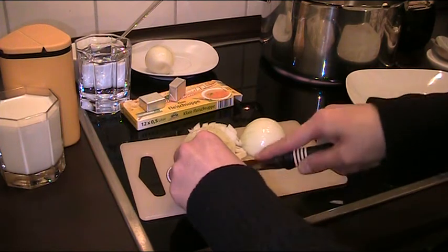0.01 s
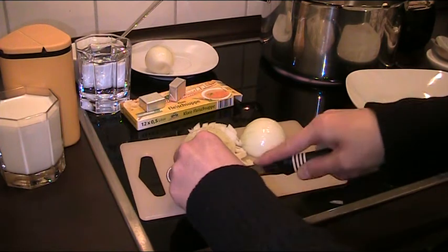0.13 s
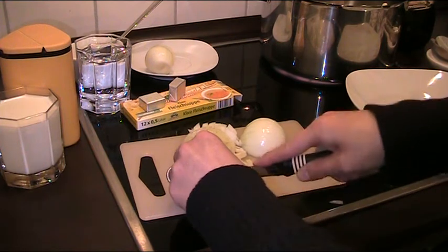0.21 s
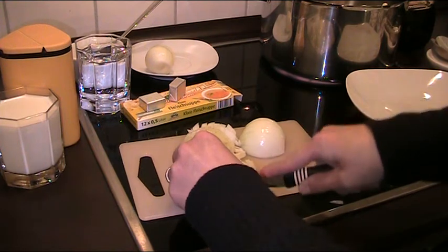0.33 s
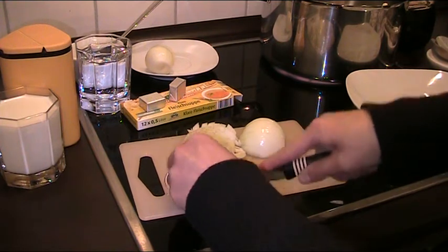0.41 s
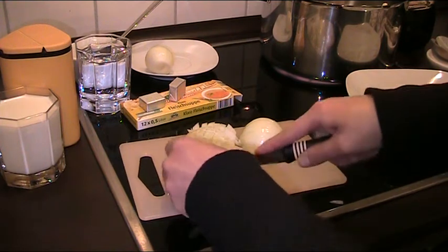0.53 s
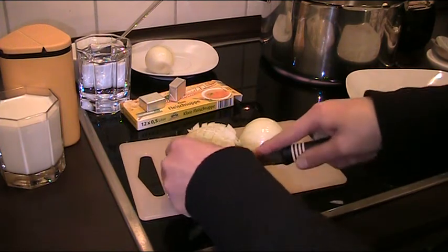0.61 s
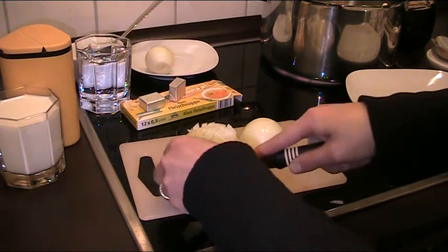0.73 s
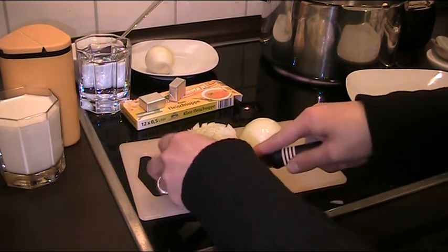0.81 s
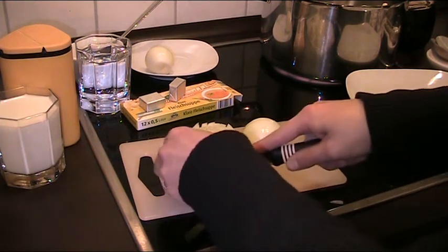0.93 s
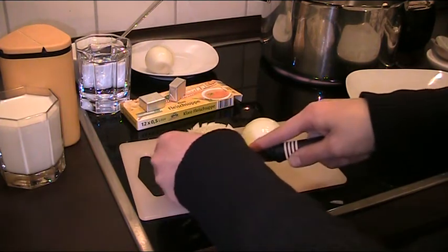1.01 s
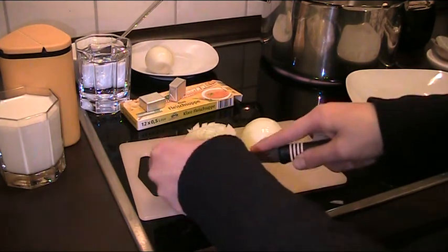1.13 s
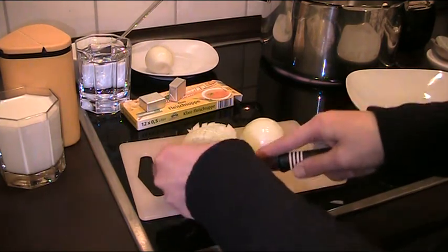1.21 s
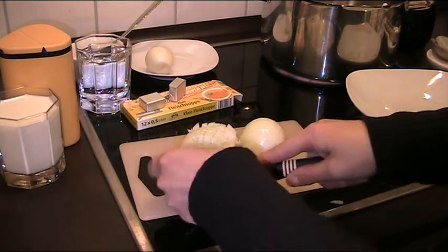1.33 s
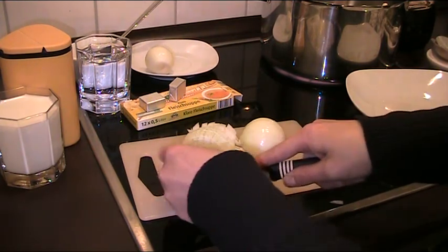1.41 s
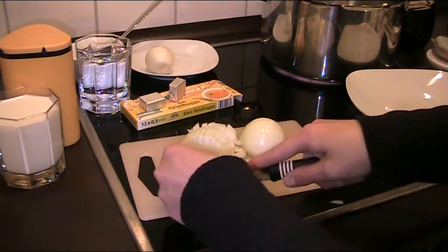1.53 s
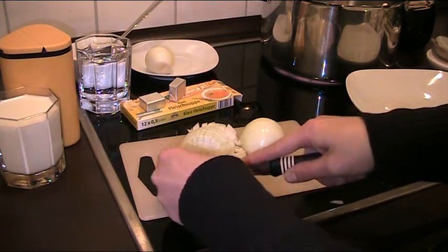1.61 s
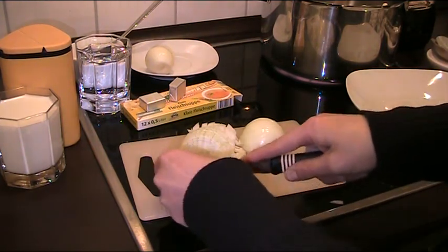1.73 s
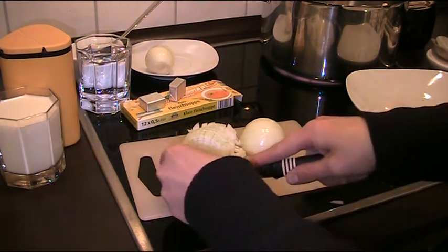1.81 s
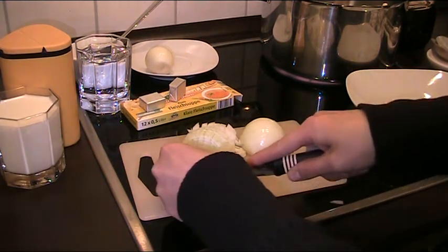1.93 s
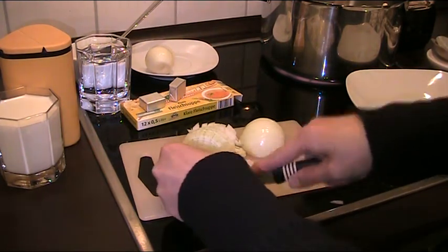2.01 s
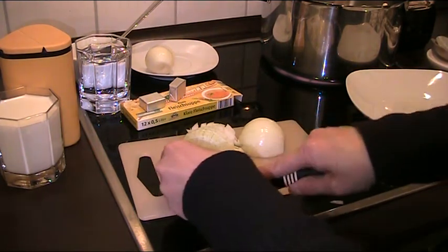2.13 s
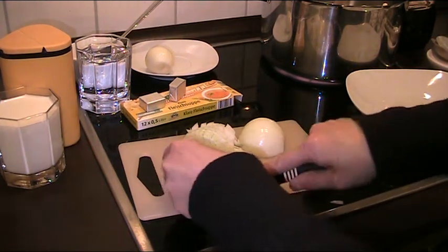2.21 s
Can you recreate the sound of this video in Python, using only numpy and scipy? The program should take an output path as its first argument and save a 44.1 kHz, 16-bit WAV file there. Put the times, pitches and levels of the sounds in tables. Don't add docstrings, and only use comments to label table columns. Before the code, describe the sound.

A kitchen knife crunches through onion and knocks hard on a plastic board, twice, with a pause between

```python
import sys
import numpy as np
from scipy import signal
from scipy.fft import rfft, irfft
from scipy.io import wavfile
from scipy.ndimage import uniform_filter1d

SR = 44100
rng = np.random.default_rng(int(sys.argv[2]) if len(sys.argv) > 2 else 0)


def makeup_ratio(level_db):
    decades = np.asarray(level_db, float) / 20
    return 10 ** decades


def persist_wave(psi):
    counts = np.round(np.clip(psi, -1, 1) * 32767).astype(np.int16)
    wavfile.write(sys.argv[1], SR, np.atleast_2d(counts).T)


N = 101430


def evened(x):
    return x / np.sqrt(np.mean(x ** 2) + 1e-20)


def read(points, hz):
    f, value = np.transpose(points)
    return np.interp(np.log(hz + 1), np.log(f + 1), value)


def add(mix, start_s, sound):
    part = mix[max(round(start_s * SR), 0):][:len(sound)]
    part += sound[:len(part)]


def colour(x, table):
    hz = np.fft.rfftfreq(256, 1 / SR)
    kernel = np.roll(irfft(makeup_ratio(read(table, hz))), 128) * np.hanning(256)
    return signal.oaconvolve(x, kernel, "same")


def ring(modes, push_s):
    t = np.arange(30000) / SR
    tones = sum(makeup_ratio(db - 60 * t / t60) * np.sin(2 * np.pi * hz * t) for hz, db, t60 in modes)
    return (1 - np.exp(-t / push_s)) * tones


def swell(start_s, rise_s, fall_s):
    t = np.arange(N) / SR - start_s
    return np.clip(t / rise_s, 0, 1) * makeup_ratio(-20 * np.maximum(t - rise_s, 0) / fall_s)


def partner(a, b, same):
    return same * a + np.sqrt(1 - same ** 2) * b


# freq_hz, level_db_per_hz
AIR_SPECTRUM = [(25, -25.5), (60, -8), (200, -5), (800, -8), (1400, -12.5), (8500, -24), (10500, -30),
                (15600, -34.5)]
# freq_hz, likeness_-1_to_1
AIR_LIKENESS = [(60, -0.18), (240, -0.0), (950, -0.29), (3770, 0.07), (15000, 0.23)]
# freq_hz, tilt_db
AIR_TILT = [(60, 2.5), (380, -1.5), (2380, 0.5), (15000, 0)]
# pitch_hz, level_db
HUM = [(48.4, -73), (96.9, -74.5), (150.7, -82), (193.8, -76), (247.6, -73.5), (366.1, -76.5),
       (640.6, -91.5), (786.0, -76.5)]
AIR_DB = -57


def air():
    frames, hz = N // 512 + 5, np.fft.rfftfreq(2048, 1 / SR)
    a, b, c, d, patches = rng.standard_normal((frames, 1025, 5)).T
    patches = uniform_filter1d(patches, size=30, axis=0)
    patches = evened(uniform_filter1d(patches, size=6, axis=1))
    left = a + 1j * b
    z = np.array([left, partner(left, c + 1j * d, read(AIR_LIKENESS, hz)[:, None])])
    tilt_db = np.multiply.outer([.5, -.5], read(AIR_TILT, hz))[..., None]
    z *= makeup_ratio(read(AIR_SPECTRUM, hz)[:, None] + 1.1 * patches + tilt_db)
    noise = signal.istft(z, nperseg=2048, noverlap=1536)[1][:, :N]

    t, hum = np.arange(N) / SR, np.zeros(N)
    for pitch_hz, db in HUM:
        waver = evened(uniform_filter1d(rng.standard_normal(N), size=3000))
        hum += makeup_ratio(db + 2.5 + 2.5 * waver) * np.sin(2 * np.pi * (pitch_hz * t + rng.random()))
    return makeup_ratio(AIR_DB) * evened(noise) + hum


# start_s, rise_s, fall_s, level_db
SHUFFLE = [
    (0, .06, 0.074, -57.5),
    (1.29, 0.0346, 0.088, -57.5),
]
SHUFFLE_HZ, SHUFFLE_WIDTH_HZ = 340, 210


def shuffle():
    edges_hz = [SHUFFLE_HZ - SHUFFLE_WIDTH_HZ / 2, SHUFFLE_HZ + SHUFFLE_WIDTH_HZ / 2]
    band = signal.butter(1, edges_hz, "band", fs=SR, output="sos")
    rub = evened(signal.sosfilt(band, rng.standard_normal(N)))
    return rub * sum(makeup_ratio(db) * swell(s, rise, fall) for s, rise, fall, db in SHUFFLE)


# pitch_hz, level_db, t60_s
WORKTOP = [(96, -50, 1.5), (108, -49.5, .3), (38, -37, 0.41), (209.2, -38, 0.89)]
# pitch_hz, level_db, t60_s
JOLT = [(70, -31, 0.037), (104, -31, 0.056)]
# start_s, level_db
WORKTOP_HITS = [
    (0.2503, -1.5),
    (1.303, -23),
    (1.9959, -12.5),
]


def worktop():
    out = np.zeros(N)
    boom = ring(WORKTOP, push_s=0.035) + ring(JOLT, push_s=0.003)
    for s, db in WORKTOP_HITS:
        add(out, s, makeup_ratio(db) * boom)
    return out


# start_s, level_db, pitch_hz, t60_s
TICKS = [(0.0193, -42.5, 8830, 0.0088), (.035, -48, 7200, 0.0067), (.1975, -47, 8800, .006),
         (0.2109, -24.5, 812, 0.046), (.2108, -22.5, 1330, .02), (0.4256, -37.5, 4200, 0.0084),
         (0.213, -31.5, 1200, 0.023), (0.211, -28.5, 1700, 0.0097), (.211, -28, 2700, 0.025),
         (.211, -51.5, 14600, .012), (0.2213, -28.5, 1060, 0.034), (.2535, -18.5, 8610, .006),
         (.2573, -18, 7230, .005), (2.2957, -28.5, 4160, 0.005), (2.296, -28.5, 2620, 0.0065),
         (0.2447, -17, 1650, .015), (.2685, -20.5, 1900, 0.017), (0.4268, -29.5, 7360, 0.004),
         (0.9472, -47, 8320, .015), (1.0076, -54, 6510, 0.0041), (1.0814, -45.5, 3980, 0.005),
         (1.2002, -29.5, 2030, 0.0027), (1.2018, -31.5, 3600, .002), (1.1988, -48, 6300, 0.005),
         (1.2009, -36, 6700, 0.005), (1.2025, -43, 8500, .012), (1.269, -47, 7200, 0.009),
         (1.3072, -37.5, 3800, 0.0093), (1.3072, -39.5, 5900, 0.0045), (1.3075, -49, 400, 0.017),
         (1.3327, -44, 1560, 0.014), (1.355, -42, 352, 0.014), (1.424, -48, 4000, .01),
         (1.4325, -45, 4170, 0.01), (1.4435, -47, 4030, .012), (1.357, -50.5, 8350, .01),
         (1.335, -48, 4000, 0.0071), (1.47, -44, 2990, 0.0065), (1.499, -46.5, 7000, .004),
         (1.5973, -46, 3406, 0.0069), (1.643, -49, 8100, 0.0074), (1.6766, -38.5, 3140, 0.016),
         (1.7671, -63, 3900, 0.0051), (1.9168, -44, 7000, .006), (1.9295, -45.5, 6500, 0.0087),
         (1.9575, -36, 1620, .01), (2.1595, -49.5, 7900, .006), (2.1595, -53.5, 14000, .006),
         (2.1645, -46, 12900, 0.0023), (2.2146, -49, 8500, 0.0064), (2.2405, -44, 3970, 0.005),
         (2.25, -48, 14000, .008), (2.255, -58, 13000, .008), (2.2955, -34, 14000, .01),
         (2.2955, -36, 11700, 0.011)]
SPIT_DB, SPIT_T60_S, SPIT_SLOPE_DB, SPIT_RISE_S = -5.5, 0.011, -16.5, .0006


def ticks():
    out, t = np.zeros(N), np.arange(2000) / SR
    for s, db, hz, t60 in TICKS:
        add(out, s, ring([(hz, db, t60)], t60 / 12))
        band = [(hz / 2, SPIT_SLOPE_DB), (hz, 0), (2 * hz, SPIT_SLOPE_DB), (8 * hz, -45)]
        spit = evened(colour(rng.standard_normal(len(t)), band))
        fade = makeup_ratio(db + SPIT_DB - 60 * t / SPIT_T60_S) * (1 - np.exp(-t / SPIT_RISE_S))
        add(out, s, fade * spit)
    return out


# start_s, rise_s, fall_s, level_db, brightness_db
CRUNCH = [(.012, 0.0083, 0.027, -76, 19), (0.21, 0.0014, 0.024, -39, -1), (.241, 0.0034, .01, -60, 21),
          (0.2448, 0.0049, 0.022, -20.5, -5.5), (0.422, 0.0059, 0.0074, -69.5, 29),
          (0.453, 0.0048, 0.011, -50, 6), (.635, 0.0039, .02, -59, 2), (.715, 0.019, 0.025, -58.5, -2.5),
          (.91, 0.043, 0.041, -56.5, 2), (1.171, 0.013, 0.013, -70.5, 18.5),
          (1.202, 0.0024, 0.0049, -49, 7.5), (1.319, 0.021, 0.11, -54.5, -0.5),
          (1.419, 0.019, 0.045, -56.5, -2.5), (1.499, 0.054, 0.036, -61.5, 0), (1.765, .01, 0.032, -58, 2),
          (1.9, 0.026, 0.051, -55.5, 1), (1.946, 0.014, 0.072, -42.5, 1), (1.9821, 0.013, 0.02, -24.5, -1),
          (2.019, 0.02, 0.04, -54, 9), (2.232, 0.0077, 0.077, -61, 7), (2.294, 0.0025, 0.0033, -44, 12.5)]
# freq_hz, level_db_per_hz
FLESH = [(900, -11.5), (1700, -6), (2600, -10.5), (4000, -9.5), (5200, -14.5), (8500, -11), (11000, -25),
         (15600, -28)]
SNAPS_PER_S, SNAP_SPREAD_DB, CLUMP_DB, BRIGHT_HZ = 11000, -2.5, 2, 4980


def crunch():
    snaps = (rng.random(N) < SNAPS_PER_S / SR) * rng.choice([-1., 1.], N)
    snaps *= makeup_ratio(SNAP_SPREAD_DB * np.minimum(rng.exponential(1, N), 4))
    clumps = makeup_ratio(CLUMP_DB * evened(uniform_filter1d(rng.standard_normal(N), size=130)))
    snaps = evened(colour(snaps * clumps, FLESH))
    dull = signal.sosfiltfilt(signal.butter(2, BRIGHT_HZ, fs=SR, output="sos"), snaps)
    bright = snaps - dull
    out = np.zeros(N)
    for s, rise, fall, db, bright_db in CRUNCH:
        flesh = dull * makeup_ratio(-bright_db) + bright * makeup_ratio(bright_db)
        out += makeup_ratio(db) * swell(s, rise, fall) * flesh
    return out


# start_s, level_db, thud_db, crack_db
KNOCKS = [(0.1974, -50.5, -20, 5.5), (0.2105, -19.5, -9.5, -8.5), (0.2459, -18, 2, -16),
          (.2525, 0, -11, -10), (.2600, -23, 6.5, -8.5), (.2640, -32.5, 12.5, 6), (1.9597, -53, 17, 2),
          (1.9852, -36, -6, -1.5), (1.998, -7, -6.5, -10), (2.0093, -16.5, -10, -17),
          (2.2956, -26.5, -12, -6.5)]
# pitch_hz, level_db, t60_s
SLAP = [(1608, -2, 0.014), (1750, -4, 0.016), (1360, -16.5, 0.022), (2030, -11, 0.0075),
        (2250, -12.5, 0.0098)]
# pitch_hz, level_db, t60_s
THUD = [(391, -2, 0.02765), (488, -2.5, 0.018), (247, -13.5, 0.052), (714, -9.5, 0.038), (950, -23, 0.0052),
        (1035, -5, .012)]
# pitch_hz, level_db, t60_s
CRACK = [(2750, -6, .006), (3450, -2, .007), (4250, -6, .006), (6000, -10, .004), (7170, -12, .004),
         (8600, -12, .004)]
PUSH_S, SPLINTER_DB, SPLINTER_T60_S = .0002, -3, 0.011


def knocks():
    out, t = np.zeros(N), np.arange(30000) / SR
    slap, thud = ring(SLAP, PUSH_S), ring(THUD, PUSH_S)
    for s, db, thud_db, crack_db in KNOCKS:
        detune = rng.uniform(.93, 0.97, len(CRACK))
        crack = ring([(hz * d, g, t60) for (hz, g, t60), d in zip(CRACK, detune)], PUSH_S / 4)
        splinter = evened(colour(rng.standard_normal(len(t)), FLESH))
        crack += makeup_ratio(SPLINTER_DB - 60 * t / SPLINTER_T60_S) * splinter
        add(out, s, makeup_ratio(db) * (slap + makeup_ratio(thud_db) * thud + makeup_ratio(crack_db) * crack))
    return out


# freq_hz, t60_s
ROOM = [(100, 0.72), (300, 0.73), (1000, 0.74), (1800, 0.71), (2800, 0.73), (4500, 0.57), (8000, 0.58),
        (14000, 0.31)]
# freq_hz, level_db
ROOM_COLOUR = [(200, 9), (430, 5), (1300, 0), (1900, 1.5), (2600, 2), (6000, 3), (8500, -4.5), (15000, -6)]
# freq_hz, likeness_0_to_1
ROOM_LIKENESS = [(100, 1), (350, 1), (1500, 0.87), (4000, 0.45), (14000, .2)]
# delay_s, left_db, right_db
ECHOES = [
    (.0047, -10.5, -11),
    (.0076, -11.5, -13.5),
    (0.01, -31.5, -20.5),
    (0.017, -20.5, -23.5),
    (0.0192, -19.5, -17.5),
]
ROOM_DB, SMEAR_FROM_HZ = -6.5, 1300


def kitchen(x):
    hz, t, z = signal.stft(x, SR, nperseg=512, noverlap=384)
    power = abs(z) ** 2
    wide = np.clip(hz / SMEAR_FROM_HZ - 1, 0, 1)[:, None]
    narrow_power = uniform_filter1d(power, size=2, axis=0)
    wide_power = uniform_filter1d(power, size=11, axis=0)
    power = (1 - wide) * narrow_power + wide * wide_power
    keep = makeup_ratio(-120 * 128 / SR / read(ROOM, hz))
    held = np.array([signal.lfilter([0, 0, 0, 1 - k], [1, -k], p) for k, p in zip(keep, power)])

    a, b, c, d = rng.standard_normal((len(t), len(hz), 4)).T
    left = a + 1j * b
    z = np.array([left, partner(left, c + 1j * d, read(ROOM_LIKENESS, hz)[:, None])])
    z *= np.sqrt(2 * abs(held)) * makeup_ratio(ROOM_DB + read(ROOM_COLOUR, hz))[:, None]
    late = signal.istft(z, SR, nperseg=512, noverlap=384)[1][:, :N]

    early = np.zeros((2, N))
    for s, left_db, right_db in ECHOES:
        add(early[0], s, makeup_ratio(left_db) * x)
        add(early[1], s * 1.01, makeup_ratio(right_db) * x)
    return late + early


# freq_hz, left_lead_rad
PORT_LEAD = [(1000, 0.056), (4000, 0.28), (9000, 0.066), (15000, 2.4)]
# freq_hz, tilt_db
PORT_TILT = [(60, 2.5), (300, 1.8), (1500, 1.2), (5000, 0.9), (12000, -0.5)]
# freq_hz, level_db
CASE_DIP = [(1500, 0), (1700, -0.5), (2100, -0.5), (4400, 0.5), (4700, -2), (5300, -2), (5800, 1.5),
            (6600, 0)]
BOARD_CUT_HZ = 325


def scene():
    cut = signal.butter(3, BOARD_CUT_HZ, "high", fs=SR, output="sos")
    near = shuffle() + signal.sosfilt(cut, ticks() + crunch() + knocks())
    heard = worktop() + near + kitchen(near)
    hz = np.fft.rfftfreq(N, 1 / SR)
    half = makeup_ratio(read(PORT_TILT, hz) / 2) * np.exp(.5j * read(PORT_LEAD, hz))
    ports = np.array([half, 1 / half])
    return irfft(rfft(heard) * makeup_ratio(read(CASE_DIP, hz)) * ports, N) + air()


def top_cut(x):
    return signal.sosfilt(signal.butter(12, 15780, fs=SR, output="sos"), x)


CEILING, EDGE_HZ = 1.02, 15900


def record(dry):
    clipped = np.clip(dry, -CEILING, CEILING)
    lowpass = signal.firwin(511, EDGE_HZ, window=("kaiser", 9), fs=SR)
    mix = signal.oaconvolve(clipped, lowpass[None], "same")
    return top_cut(mix)


dry = scene()
out = record(dry)
persist_wave(out)
```